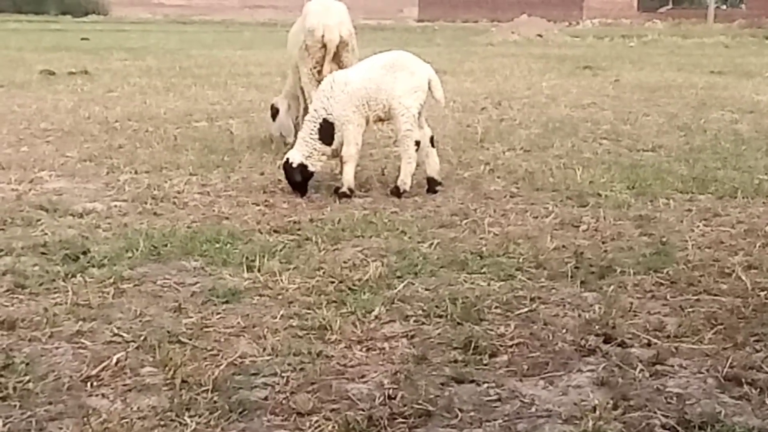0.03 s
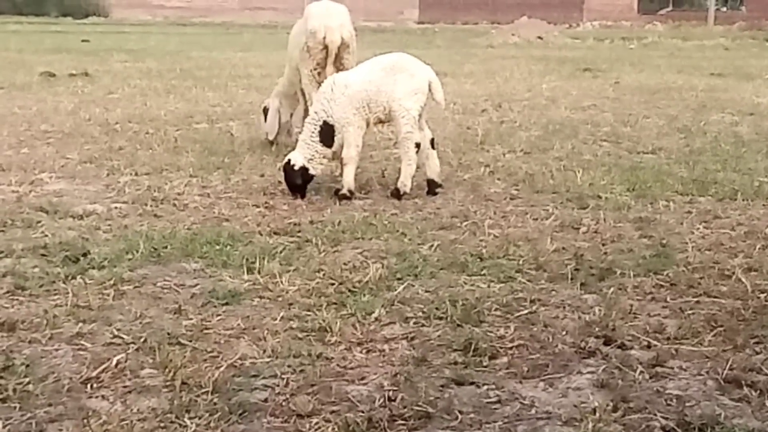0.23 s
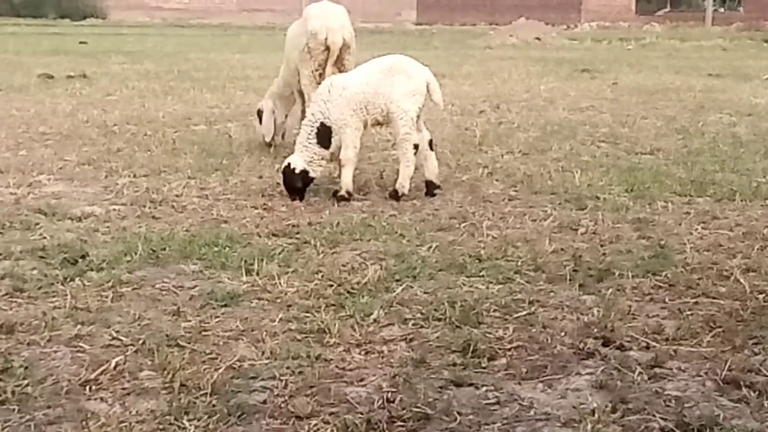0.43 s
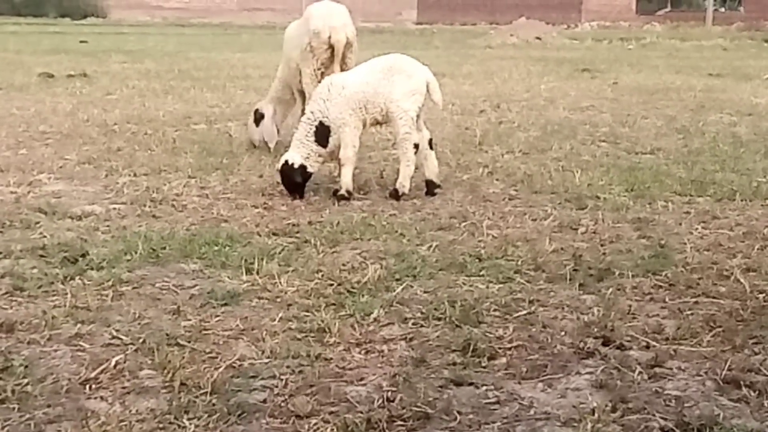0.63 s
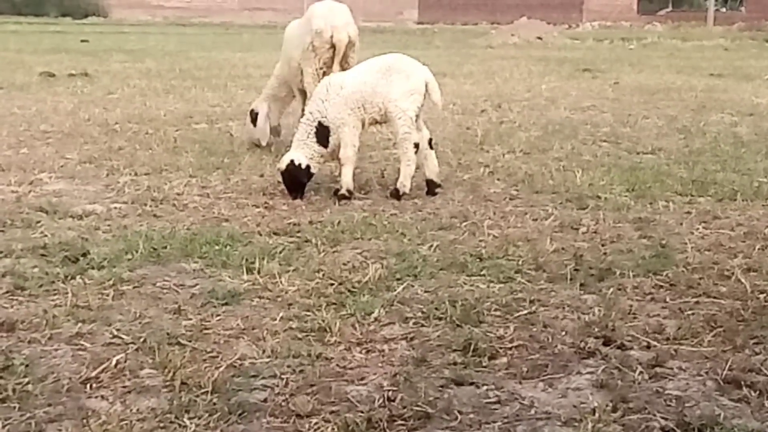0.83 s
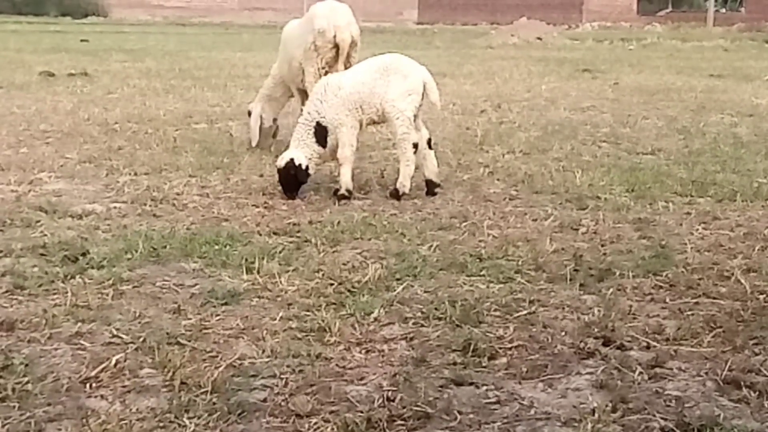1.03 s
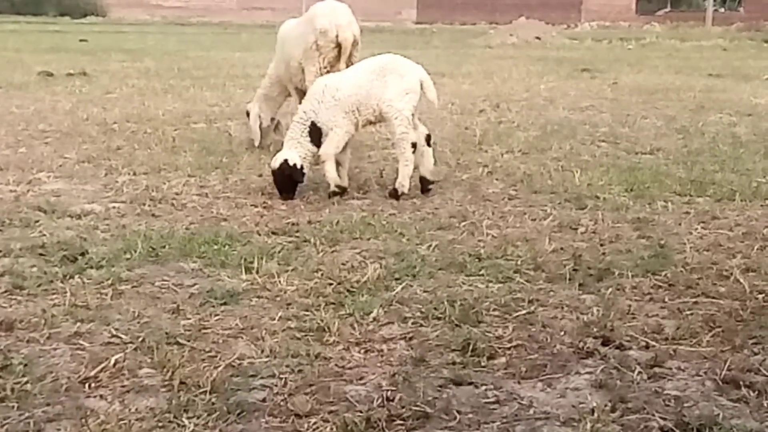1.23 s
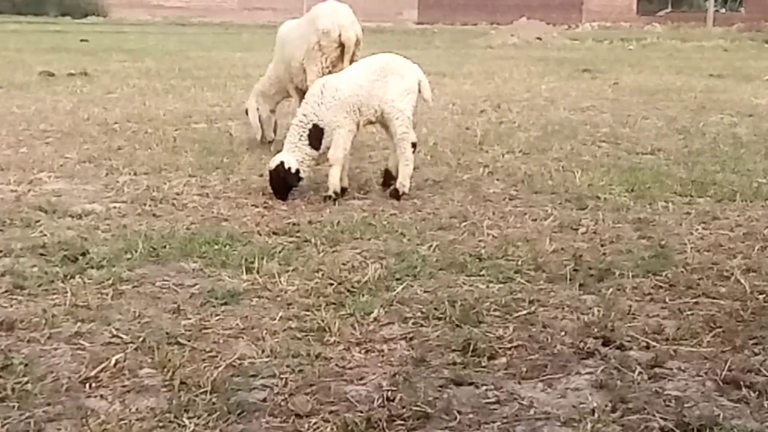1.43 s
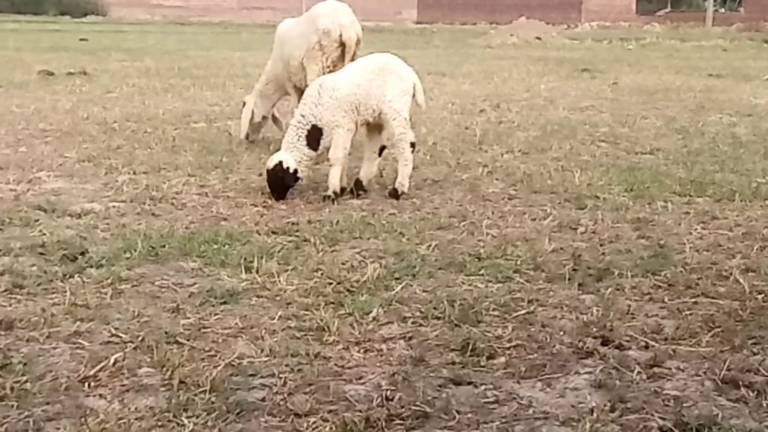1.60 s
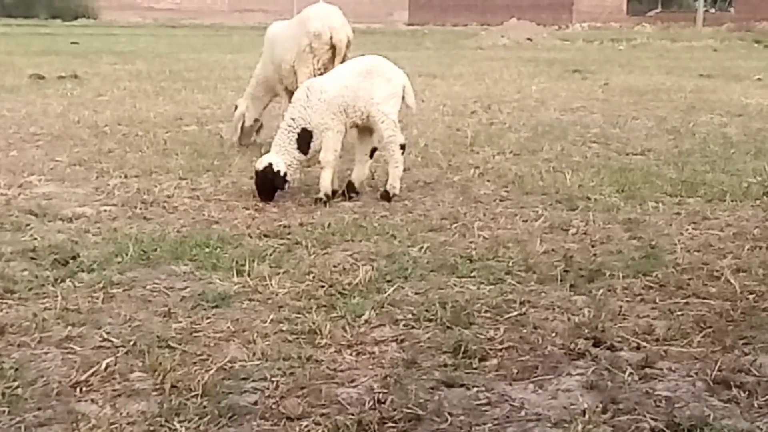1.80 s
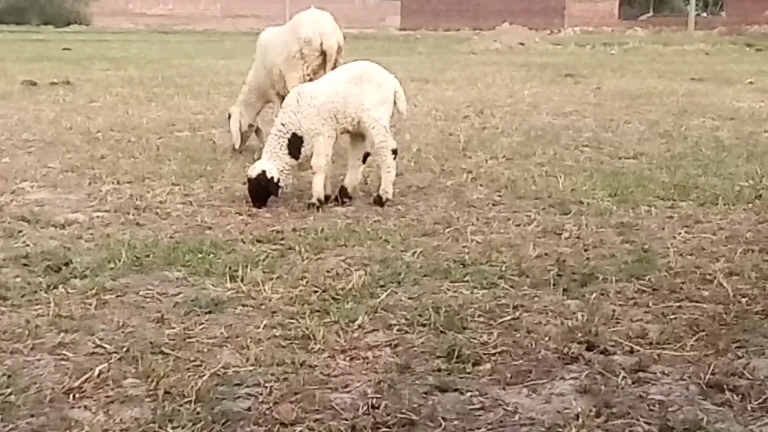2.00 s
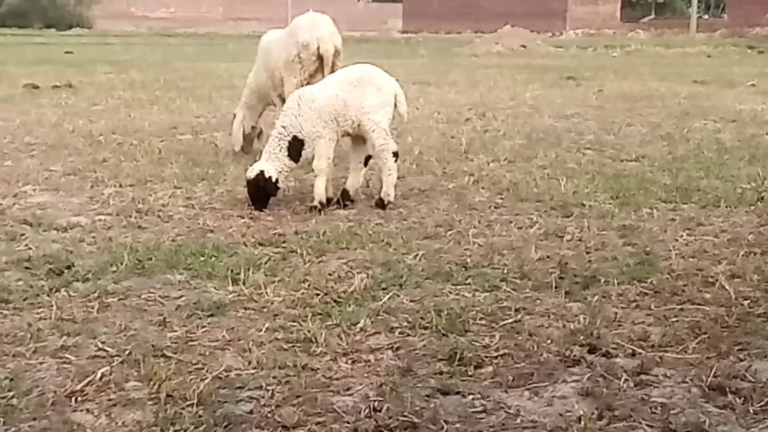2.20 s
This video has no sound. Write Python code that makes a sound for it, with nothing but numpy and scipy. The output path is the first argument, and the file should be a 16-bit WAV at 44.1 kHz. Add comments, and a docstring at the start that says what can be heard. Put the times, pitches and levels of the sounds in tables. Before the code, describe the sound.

A sheep bleats once, loud and rattling, close on the left, ending with a short mouth click. Faint birds and a distant animal call over the low rumble and soft hiss of an open field.

```python
"""A sheep bleats once, close to the microphones on the left, in a field near a wall. Sharp pulses ring
its throat in a harsh rattle that stumbles, steadies, and ends in a click and a short rasp of the mouth.
One soft bump falls under it. Far off to the right an animal calls and small birds chirp; far to the left
a bird repeats a falling cry. Thin whistles hang over a low rumble and a soft outdoor hiss."""
import sys
import numpy as np
from scipy import signal
from scipy.fft import rfft, irfft, next_fast_len
from scipy.io import wavfile
from scipy.ndimage import uniform_filter1d, map_coordinates

SR = 44100
rng = np.random.default_rng(int(sys.argv[2]) if len(sys.argv) > 2 else 0)


def generate_wav(signal):
    """Clip the signal to [-1, 1] and save it as 16-bit WAV at the path in sys.argv[1]."""
    frames = np.transpose(np.atleast_2d(signal))
    scaled = np.clip(frames, -1, 1) * 32767
    pcm = np.round(scaled).astype(np.int16)
    wavfile.write(sys.argv[1], SR, pcm)


N = 103635

# spectrum of the open air: freq_hz, relative_db
AIR_SPECTRUM = [(22, -28), (40, -21), (70, -4), (130, 1.5), (165, -7), (225, -10), (275, -6), (360, -15.5),
                (760, -24.5), (1000, -23), (1400, -22), (1750, -26.5), (2400, -22.5), (3200, -21.5),
                (4100, -19.5), (5500, -24.5), (6400, -25.5), (7500, -36.5), (8800, -45), (9600, -55.5),
                (13000, -55), (15500, -62)]
# which way the air leans: freq_hz, left_minus_right_db
AIR_LEAN = [(100, -8.5), (600, -7.5), (1500, -5.5), (3000, -0.5), (6000, -5), (9000, -6.5), (14000, 4)]
# how alike the air is at the two microphones: freq_hz, correlation
AIR_COHERENCE = [(60, 0.91), (250, 0.84), (600, 0.34), (2000, 0.077), (10000, .1)]
# drift of the hiss: time_s, relative_db
HISS_DRIFT = [(0, -0.5), (.2, 0.5), (.7, -1), (1.15, 3.5), (1.45, -1), (1.78, -4), (1.9, -2), (2.04, -4.5),
              (2.2, -0.5), (2.35, -4)]
# thin whistles and, in the last row, the crying bird's first faint cry:
# start_s, length_s, relative_db, pitch_hz, left_minus_right_db
WHISTLES_AND_FIRST_CRY = [(0.737, 0.36, -55.5, 2958, -19.5), (1.073, 0.55, -55.5, 2955, -14.5),
                          (0.71, 0.98, -66, 2110, -10), (1.134, 0.51, -67, 960, -17.5),
                          (1.657, 0.4, -66.5, 958, -18.5), (-0.55, 1.93, -65.5, 1520, -18),
                          (0.37, 4.1, -66, 1335, 18), (0.028, .15, -53.5, 1335, 19)]
# call of the far animal: time_s, pitch_hz, relative_db
ANIMAL_CALL = [(0, 515, -51.5), (.1, 530, -55.5), (.15, 584.7, -50.5), (.22, 625, -48), (.3, 635, -48),
               (.39, 668, -45), (.47, 660, -51), (.56, 625, -54.5), (.65, 645, -51), (.75, 640, -76.5)]
# partials of its toot: harmonic, relative_db
TOOT_HARMONICS = [(2, -12), (3, -1), (4, -8)]
# small birds: start_s, length_s, relative_db, pitch_hz
BIRD_CHIRPS = [(0.039, 0.022, -54, 4090), (.81, 0.18, -57.5, 6310), (1.08, 0.051, -48, 6300),
               (1.119, .07, -58, 4000), (1.48, .08, -63.5, 6350), (1.825, 0.13, -69, 7700),
               (2.084, 0.049, -59, 6350), (2.075, 0.103, -54.5, 3280), (2.155, 0.039, -50, 6190),
               (2.18, 0.098, -53, 3934)]
# the bird's falling cries: start_s, length_s, relative_db, pitch_hz
BIRD_CRIES = [(0.061, 0.11, -60.5, 1337), (0.657, .09, -52, 1358), (0.882, 0.14, -51.5, 1392),
              (1.041, 0.061, -56, 1288), (1.111, 0.097, -49.5, 1417), (1.279, 0.16, -51, 1364),
              (1.598, 0.047, -45.5, 1296), (1.64, .08, -49.5, 1372), (1.815, 0.053, -56.5, 1300),
              (1.861, 0.0504, -48.5, 1411), (1.9, .08, -45.5, 1334), (2.119, 0.15, -47.5, 1373),
              (2.293, 0.052, -55, 1332)]
# partials of a falling cry: harmonic, relative_db
CRY_HARMONICS = [(1, -16.5), (2, -3), (3, -13)]
# reverberation across the field: freq_hz, t60_s
FIELD_DECAY = [(500, 0.42), (3000, 0.6), (8000, 0.29)]
# clicks before and after the bleat: start_s, level_db, resonance_hz, width_hz, decay_s
MOUTH_CLICKS = [(.222, -29.5, 1640, 400, 0.0054), (.2235, -53, 4870, 600, 0.0033),
                (.601, -30.5, 3800, 1600, 0.0055), (0.6235, -13.5, 3800, 1110, 0.0012),
                (.632, -24, 4190, 540, 0.0089), (.636, -26, 4130, 894, 0.0031),
                (0.6464, -22, 4180, 397, 0.0054), (0.66, -34, 4200, 500, 0.0099)]
# pace of the throat pulses: time_s, rate_hz
THROAT_RATE = [(.2503, 88), (.295, 117), (.312, 95), (.343, 86), (.358, 116), (.378, 116), (.385, 112.8),
               (.445, 112.8), (.455, 116), (.483, 116), (.497, 108), (.51, 112.3), (.57, 112.3),
               (.596, 100)]
# effort behind the pulses: time_s, relative_db
BLEAT_EFFORT = [(.25, -7), (.263, -3.5), (.28, -1.5), (.298, 0), (.309, -5.5), (.329, -2), (.341, 4),
                (.352, 1), (.378, 2), (.39, 1.5), (.41, 2.5), (.438, 0.5), (.483, 3.5), (.501, -2),
                (.51, -0.5), (.526, -2.5), (.55, 1.5), (.573, 1.5), (.593, -3.5)]
# resonances of the throat: freq_hz, gain_db
THROAT_RESPONSE = [(180, -75), (300, -47), (342, -25.5), (391, -52), (446, -14), (517, -26), (571, 0),
                   (620, -10.5), (685, -11), (744, -20.5), (968, -24), (1240, -2.5), (1370, -14.5),
                   (1640, -14), (2040, 0.5), (2520, -4), (2930, 2), (3280, -5.5), (3630, 0.5), (4570, -1),
                   (5210, -1.5), (6050, -17), (7140, -16), (9600, -42), (15500, -55.5)]
# ring of the half-open mouth: time_s, resonance_hz, relative_db
MOUTH_RING = [(.25, 2020, 1), (.28, 2250, 3.5), (.3, 2400, 0), (.345, 2400, -6), (.39, 2350, -29)]
# reflections close to the sheep: delay_s, gain
NEAR_REFLECTIONS = [(.0013, 0.23), (.0039, 0.074)]
# shading of the sheep at the right microphone: freq_hz, loss_db
RIGHT_SHADE = [(60, -15), (99, -9), (160, -8), (270, 3), (450, 25.5), (740, 6), (1220, 24.5), (2010, 15.5),
               (3330, 27), (5500, 9.5), (9080, 10.5), (15000, 11)]
# reverberation off the wall: freq_hz, t60_s
WALL_DECAY = [(300, 0.47), (2500, 0.17), (9000, 0.08)]
# tones of the bump: pitch_hz, relative_db
BUMP_MODES = [(125, -5), (180, 2), (245, -4.5)]


def amp(db):
    """Decibels to gain."""
    return 10 ** (np.asarray(db) / 20)


def unit(x):
    """Scale to rms 1."""
    return x / np.sqrt(np.mean(x ** 2) + 1e-20)


def along(points, hz):
    """Read (freq_hz, value) points on a log axis."""
    freqs, values = np.transpose(points)
    return np.interp(np.log(hz + 1), np.log(freqs + 1), values)


def clock():
    """Time of each sample."""
    return np.arange(N) / SR


def curves(rows):
    """One value per sample for each column after the time."""
    times, *columns = np.transpose(rows)
    return [np.interp(clock(), times, column) for column in columns]


def wobble(rate):
    """A smooth random curve, rate knots a second."""
    return map_coordinates(rng.standard_normal(int(N * rate / SR) + 4), [clock() * rate])


def grid():
    """Frequencies on which filters are written."""
    return np.fft.rfftfreq(2 * next_fast_len(N * 2 // 3), 1 / SR)


def filtered(x, response):
    """Filter x by a response on the frequency grid."""
    return irfft(rfft(x, 2 * len(grid()) - 2) * response)[..., :N]


def causal(db):
    """Minimum-phase response with the given gain."""
    cepstrum = irfft(np.log(amp(db)))
    half = len(cepstrum) // 2
    cepstrum[1:half] *= 2
    cepstrum[half + 1:] = 0
    return np.exp(rfft(cepstrum))


def pan(db):
    """Left and right gains; positive db is to the left."""
    return amp(np.array([[db], [-db]]) / 2)


def puff(start, decay, colour):
    """Coloured noise that starts at once and dies away."""
    age = clock() - start
    noise = unit(filtered(rng.standard_normal(N), colour))
    return noise * np.clip(age / 0.00027, 0, 1) * np.exp(-np.abs(age) / decay)


def note(start, length, hz, fall, waver, partials=((1, 0),)):
    """A rounded note; fall and waver are shares of its pitch."""
    progress = np.clip((clock() - start) / length, 0, 1)
    pitch = hz * (1 + fall * (.5 - progress) + waver * wobble(260))
    phase = 2 * np.pi * np.cumsum(pitch) / SR
    envelope = np.sqrt(2 * np.abs(np.sin(np.pi * progress)))
    return envelope * sum(amp(db) * np.sin(k * phase) for k, db in partials)


def held_note(start, length, db, hz, side_db, gain_db=-6.5, waver_hz=22):
    """A pure note to one side that wavers about one pitch, swells and fades."""
    level = amp(db + gain_db + 4 * wobble(34.91))
    return level * pan(side_db) * note(start, length, hz, fall=0, waver=waver_hz / hz)


def echo(x, decays):
    """A diffuse tail at each microphone; each frequency dies at its own speed."""
    hz, t, spectra = signal.stft(rng.standard_normal((2, SR // 2)), SR, nperseg=256)
    tail = signal.istft(spectra * amp(-60 * t / along(decays, hz)[:, None]), SR, nperseg=256)[1]
    return signal.fftconvolve(x, tail / np.linalg.norm(tail[0]), axes=1)[:, :N]


def patchy(x, depth_db):
    """Random patches of gain in time and frequency."""
    spectra = signal.stft(x, nperseg=1024)[2]
    patches = uniform_filter1d(rng.standard_normal(spectra.shape[1:]), size=5, axis=0)
    patches = uniform_filter1d(patches, size=7, axis=1)
    return signal.istft(spectra * amp(depth_db * unit(patches)), nperseg=1024)[1][:, :N]


def air(level_db=-51.5, swell_db=1.86, rumble_edge_hz=1250):
    """The bed of the field: a swelling low rumble under soft hiss, leaning right."""
    hz = grid()
    spread = np.arccos(np.clip(along(AIR_COHERENCE, hz), -1, 1)) / 2
    colours = amp(along(AIR_SPECTRUM, hz)) * [np.cos(spread), np.sin(spread)]
    mid, side = filtered(rng.standard_normal((2, N)), colours)
    lean_db = along(AIR_LEAN, hz) / 2
    bed = unit(filtered(np.array([mid + side, mid - side]), amp([lean_db, -lean_db])))
    rumble = filtered(bed, 1 / (1 + (hz / rumble_edge_hz) ** 4))
    swell = amp(swell_db * wobble(14))
    drift_db, = curves(HISS_DRIFT)
    hiss = patchy(bed - rumble, depth_db=2) * amp(drift_db + .7 * wobble(11.76))
    return amp(level_db) * (rumble * swell + hiss)


def whistles():
    """Thin, steady whistles in the distance, most of them to the right."""
    return sum(held_note(*row) for row in WHISTLES_AND_FIRST_CRY[:-1])


def far_animal(call_gain_db=-4, overtone_db=-12.5, toot_db=-53):
    """Far off to the right, a long, nearly pure call and a brief toot."""
    hz, db = curves(ANIMAL_CALL)
    phase = 2 * np.pi * np.cumsum(hz * (1 + .017 * wobble(119.7))) / SR
    tone = np.sin(phase) + amp(overtone_db) * np.sin(2 * phase)
    envelope = np.sqrt(2) * amp(db + call_gain_db + 3.2 * wobble(69.6)) * (clock() < ANIMAL_CALL[-1][0])
    toot = note(start=0.077, length=0.093, hz=374, fall=0.024, waver=.004, partials=TOOT_HARMONICS)
    return pan(db=-9.5) * (envelope * tone + amp(toot_db) * toot)


def first_cry():
    """The crying bird's first faint cry, far to the left."""
    return held_note(*WHISTLES_AND_FIRST_CRY[-1])


def birds(gain_db=-6.5, rough_db=3.5, field_db=-2.5):
    """High chirps on the right and rough falling cries on the left, smeared by distance."""
    cries = sum(amp(db) * note(start, length, hz, fall=.06, waver=.022, partials=CRY_HARMONICS)
                for start, length, db, hz in BIRD_CRIES)
    chirps = sum(amp(db) * note(start, length, hz, fall=.034, waver=.03)
                 for start, length, db, hz in BIRD_CHIRPS)
    direct = pan(db=17) * cries * amp(rough_db * wobble(300)) + pan(db=-9.5) * chirps
    return amp(gain_db) * (direct + amp(field_db) * echo(direct, FIELD_DECAY))


def mouth(squeak_db=-34, skirt_db=-10):
    """A tiny rising squeak and short rasping clicks as the sheep's mouth opens and closes."""
    hz = grid()
    skirt = amp(skirt_db + along(THROAT_RESPONSE, hz))
    squeak = amp(squeak_db) * note(start=.2215, length=0.0118, hz=2246, fall=-.55, waver=0)
    clicks = sum(amp(db) * puff(start, decay, np.exp(-.5 * ((hz - centre) / width) ** 2) + skirt)
                 for start, db, centre, width, decay in MOUTH_CLICKS)
    return squeak + clicks


def throat_pulses(jitter_s=.00004, scatter_db=1.17, stumble_db=3.5, stumble_end_s=.325, fade_s=.028):
    """Sharp, slightly uneven pulses with turbulence between them."""
    t = clock()
    rate, = curves(THROAT_RATE)
    effort_db, = curves(BLEAT_EFFORT)
    sounding = (t >= THROAT_RATE[0][0]) & (t < THROAT_RATE[-1][0])
    cycles = np.cumsum(rate * sounding) / SR
    count = np.arange(int(cycles[-1]) + 1)
    jitter, scatter = rng.standard_normal((len(count), 2)).T
    times = np.interp(count, cycles[sounding], t[sounding]) + jitter_s * jitter
    # strong and weak pulses alternate at the start
    stumble = np.clip((stumble_end_s - times) / fade_s, 0, 1) * (-1) ** (count + 1)
    sizes = amp(np.interp(times, t, effort_db) + stumble_db * stumble + scatter_db * scatter)
    taps = np.round(times * SR).astype(int)[:, None] + np.arange(-8, 9)
    spikes = sizes[:, None] * np.sinc(taps - times[:, None] * SR)
    pulses = np.bincount(taps.ravel(), spikes.ravel(), N)
    since_pulse_s = (cycles % 1) / rate
    rasp = amp(-41.5) + amp(-26) * np.exp(-since_pulse_s / 0.0017)  # steady, plus a burst per pulse
    return pulses + rng.standard_normal(N) * rasp * amp(effort_db) * sounding


def mouth_ring(source, width_hz=140, gain_db=3.5):
    """A narrow ring that rises and fades as the mouth opens: fixed resonances cross-faded."""
    hz = grid()
    _, level_db = curves(MOUTH_RING)
    times, centres, _ = np.transpose(MOUTH_RING)
    shares = [np.interp(clock(), times, row) for row in np.eye(len(times))]
    drive = source * amp(level_db + gain_db)
    damping = 1j * hz * width_hz
    return sum(filtered(drive * share, damping / (centre ** 2 - hz ** 2 + damping))
               for share, centre in zip(shares, centres))


def bleat(gain_db=10, sweep_s=0.00068, sweep_hz=4650):
    """The pulses ring throat and mouth; within each pulse the lows come later."""
    hz = grid()
    pulses = throat_pulses()
    delay_s = sweep_s * (np.exp(-(hz / sweep_hz) ** 2) - 1)
    sweep = np.exp(-2j * np.pi * np.cumsum(delay_s) * hz[1])
    throat = causal(along(THROAT_RESPONSE, hz))
    return amp(gain_db) * filtered(pulses + mouth_ring(pulses), throat * sweep)


def sheep(right_lag_s=0.000468, wall_db=-13):
    """Close on the left by the wall; the voice reaches the right microphone later and shaded."""
    hz = grid()
    reflections = sum(gain * np.exp(-2j * np.pi * hz * delay) for delay, gain in NEAR_REFLECTIONS)
    left = filtered(bleat(), 1 + reflections) + mouth()
    right = filtered(left, causal(-along(RIGHT_SHADE, hz)) * np.exp(-2j * np.pi * hz * right_lag_s))
    pair = np.array([left, right])
    return pair + amp(wall_db) * echo(pair, WALL_DECAY)


def bump(start_s=.323, rise_s=0.0032, decay_s=0.0078, thud_db=-32.5, scuff_db=-44):
    """One soft, low knock with a little scuff, alike at both microphones."""
    age = np.maximum(clock() - start_s, 0)
    envelope = (1 - np.exp(-age / rise_s)) * np.exp(-age / decay_s)
    thud = envelope * sum(amp(db) * np.sin(2 * np.pi * hz * age) for hz, db in BUMP_MODES)
    scuff = puff(start_s, decay=0.012, colour=1 / (1 + (grid() / 1100) ** 4))
    return amp(thud_db) * thud + amp(scuff_db) * scuff


def scene():
    """The field from where the microphones stand."""
    return sheep() + bump() + far_animal() + birds() + whistles() + first_cry() + air()


def record(dry, top_hz=15900):
    """The recorder keeps nothing above its band limit."""
    return filtered(dry, grid() < top_hz)


dry = scene()
out = record(dry)
generate_wav(out)
```